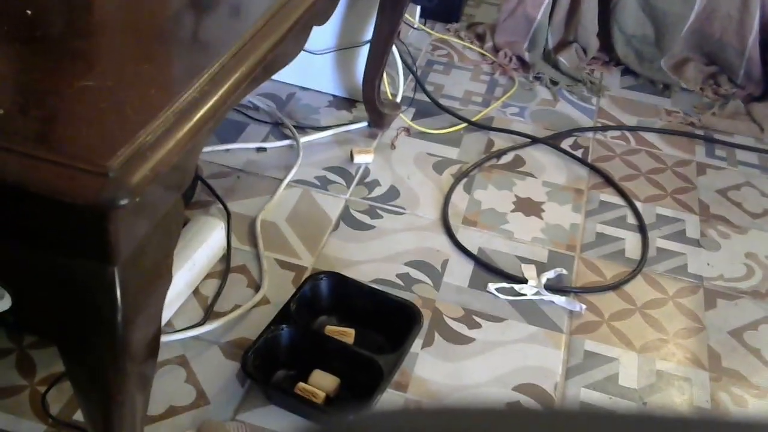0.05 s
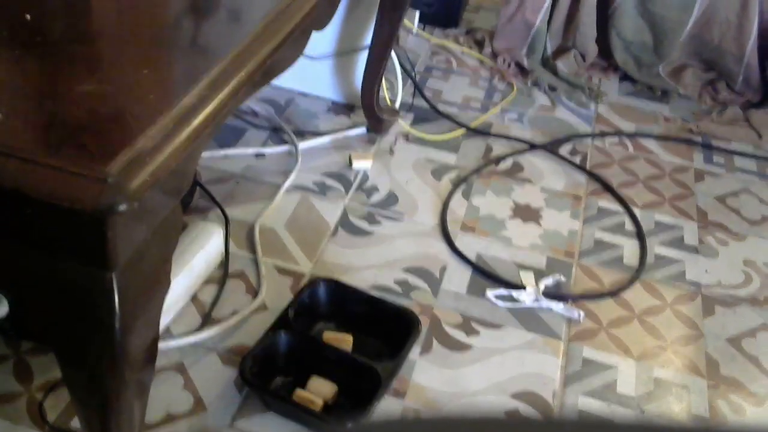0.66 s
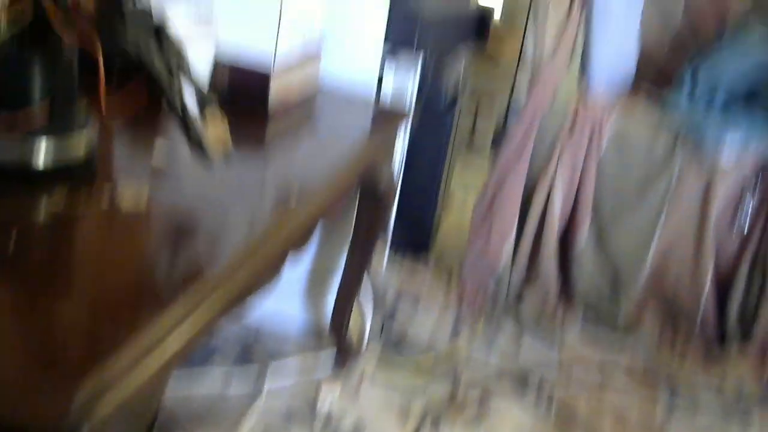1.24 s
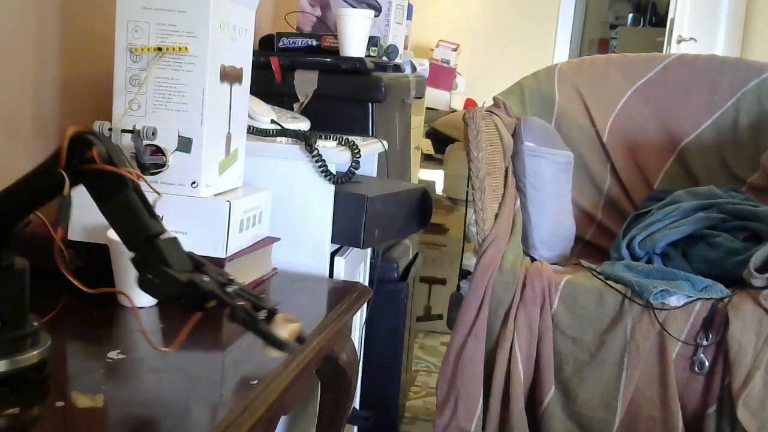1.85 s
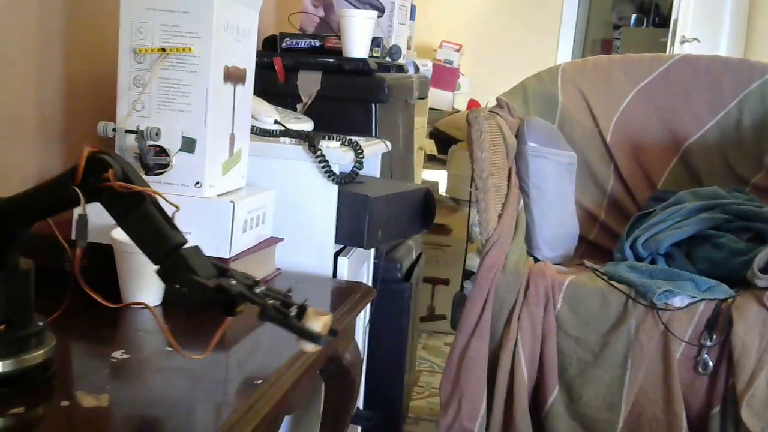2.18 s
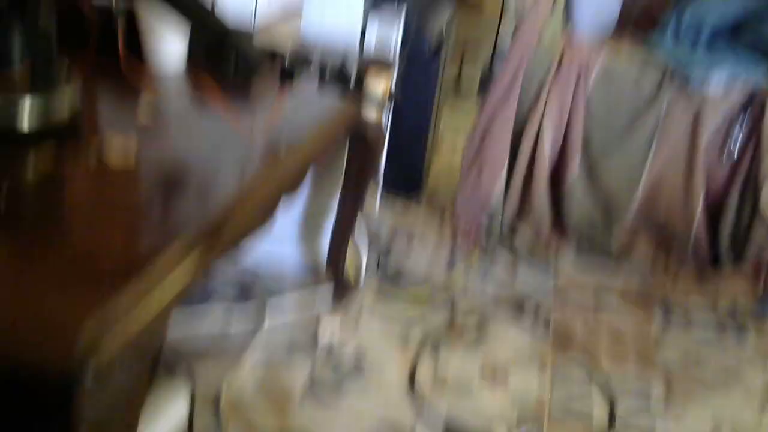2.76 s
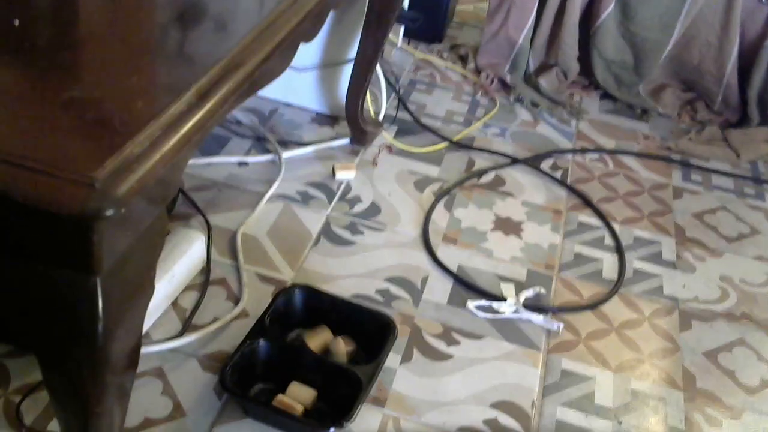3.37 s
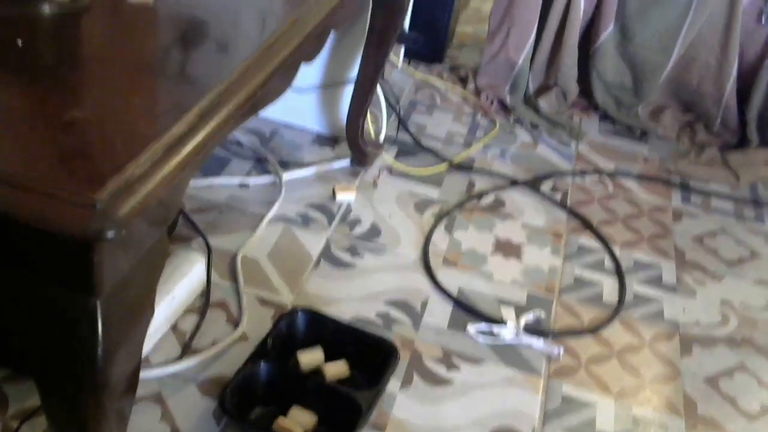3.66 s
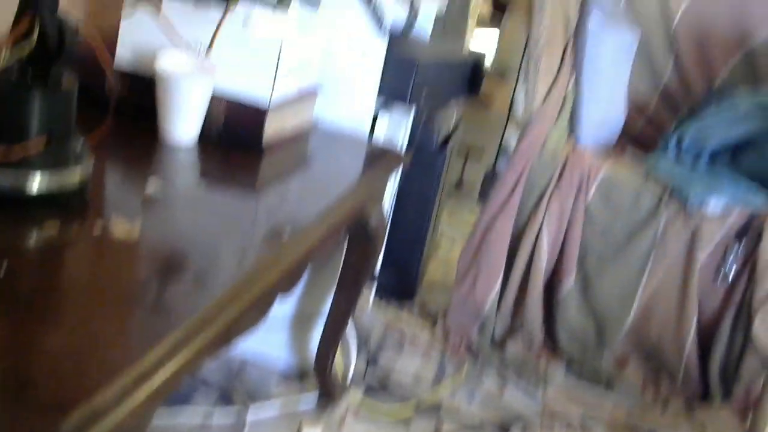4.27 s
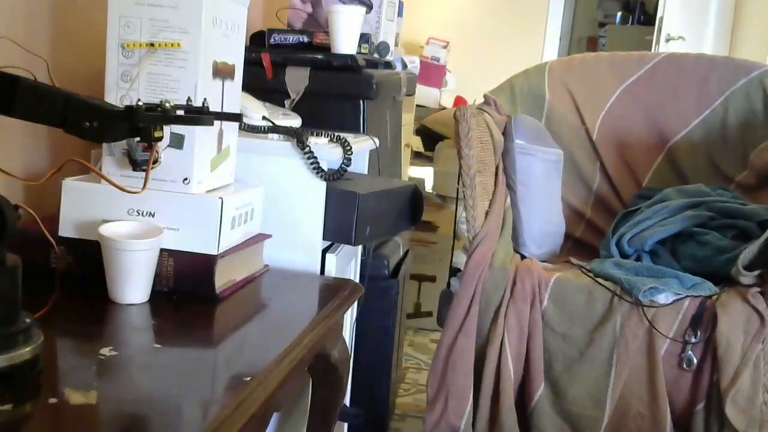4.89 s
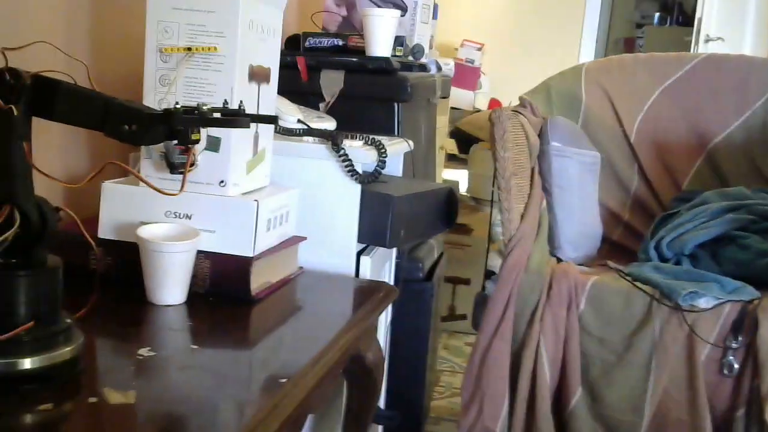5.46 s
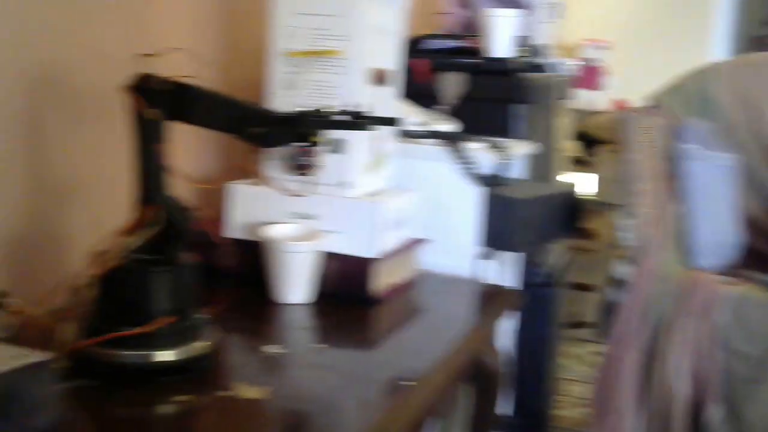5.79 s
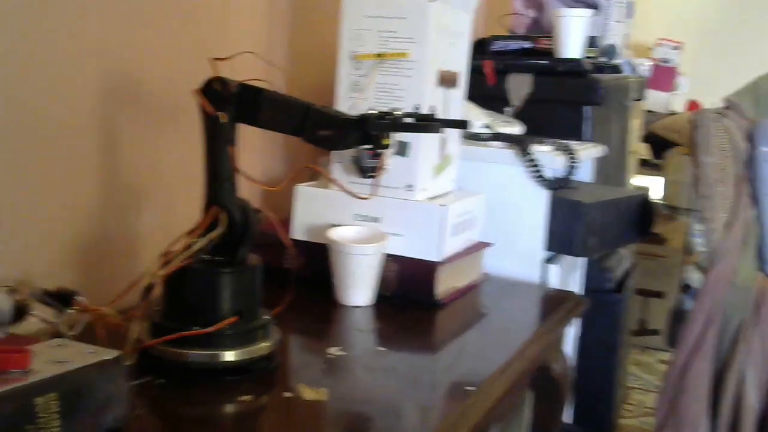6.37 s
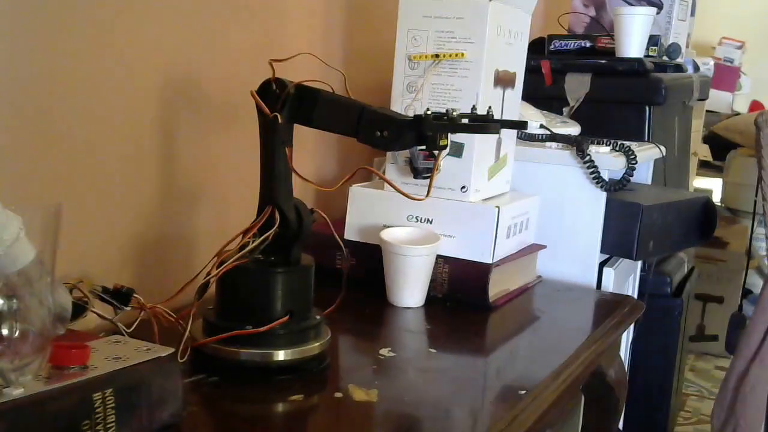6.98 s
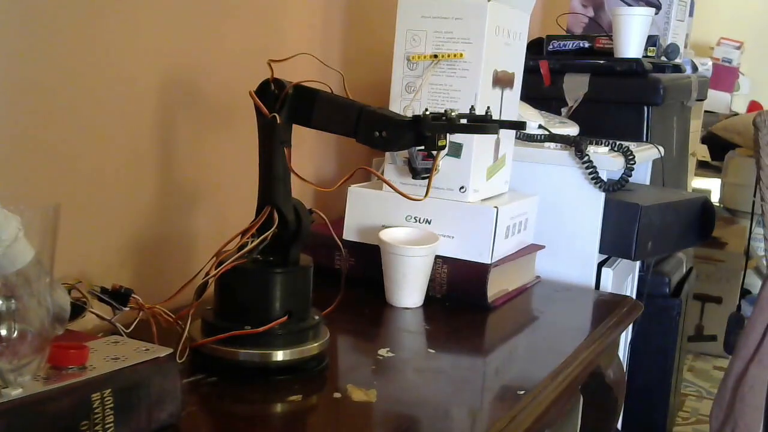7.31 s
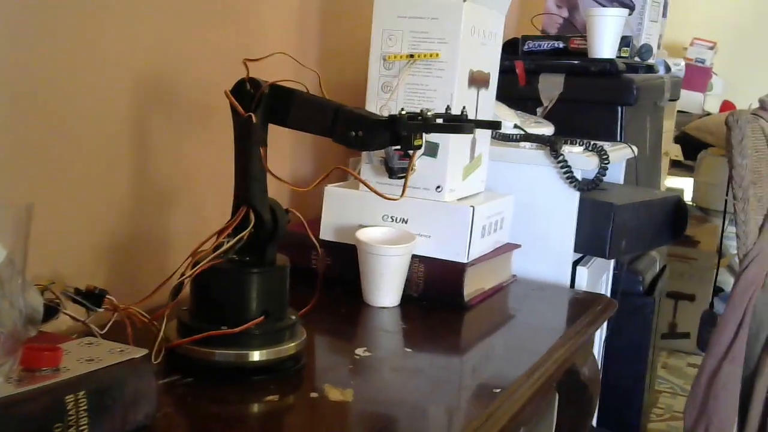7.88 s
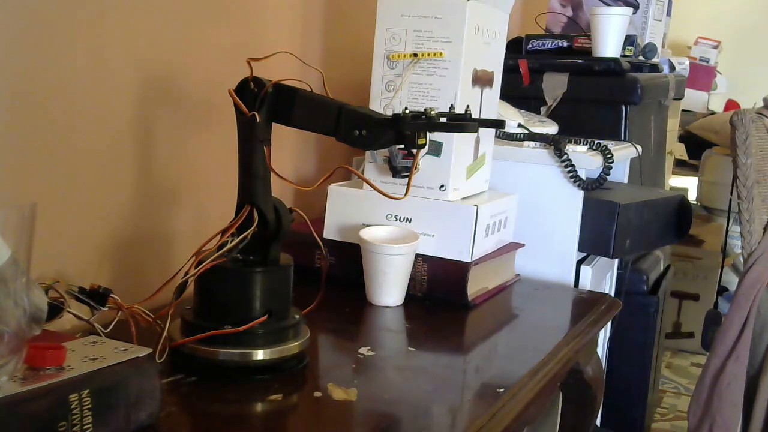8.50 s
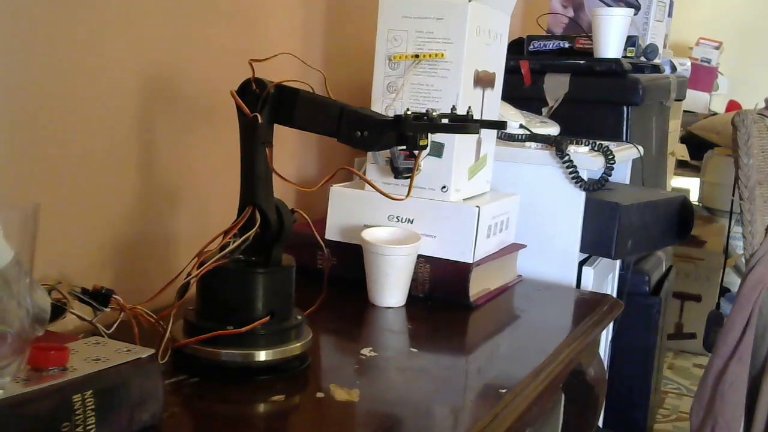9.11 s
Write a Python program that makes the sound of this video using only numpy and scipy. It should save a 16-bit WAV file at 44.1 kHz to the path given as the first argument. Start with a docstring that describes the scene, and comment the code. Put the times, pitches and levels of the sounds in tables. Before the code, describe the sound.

A small robot arm's geared servos whirr close by, thin, high and slightly grinding, each burst rising and falling in pitch and loudness. A short burst opens, followed by smaller twitches and a faint rustle around 0.5 seconds. A longer whirr runs from about 1.1 to 2 seconds, with a light hollow click at 1.5. Brief bursts come at 2.5 and 2.8 seconds. The loudest, highest sweep lasts from 3.1 to 3.7 seconds. Over it, at about 3.2, a small block drops into a thin plastic tray with a sharp clatter, the loudest sound, then bounces and rolls to rest by 3.7. Weaker whirrs follow, ending with a soft click and short buzz at about 4.5 seconds. From there until about 9 seconds there is only the quiet hush of a small furnished room, with a faint hum and a few soft, dull handling bumps.

```python
"""Geared servos whirr close by as a hobby robot arm on a table moves in short bursts.
Their gear teeth tap and grind; each move speeds up, cruises and brakes, and pitch, loudness and
brightness follow its pace. The arm drops a small block into a thin plastic tray, which rings
as the block bounces and rolls to rest. A few light clicks and a soft rustle sound over the hush
of a small furnished room."""
import sys
import numpy as np
from scipy import signal
from scipy.fft import rfft, irfft, next_fast_len
from scipy.io import wavfile
from scipy.ndimage import map_coordinates

SR = 44100
rng = np.random.default_rng(int(sys.argv[2]) if len(sys.argv) > 2 else 0)


def store_wav(level_fs):
    """Save 16-bit WAV to argv[1]."""
    pcm = np.round(np.clip(np.atleast_2d(level_fs), -1, 1) * 32767)
    wavfile.write(sys.argv[1], SR, pcm.T.astype(np.int16))


N = 407925

# Tone colours of the gearbox, the arm's ringing, the motor's thin buzz and a high fizz.
# Each row: frequency in Hz, relative level in dB.
GEARBOX_COLOUR = [(3600, -35.5), (4100, -17), (4450, -4), (4950, 0), (5250, 1.5), (5550, 0.5), (6150, 1),
                  (6600, -9.5), (7400, -26.5)]
ARM_COLOUR = [(1400, -39), (2000, -19.5), (2450, -13.5), (2950, -8.5), (3300, -6.5), (3750, -3), (4300, -4),
              (5200, -23.5)]
MOTOR_COLOUR = [(5200, -25.5), (6200, -6), (6600, 2.5), (7350, 0.5), (7800, -3), (8150, -10.5),
                (8450, -11.5), (9000, -15.5), (9700, -20.5), (11000, -38.5)]
FIZZ_COLOUR = [(8000, -31), (10000, 5), (11200, -0.5), (12500, -13), (15500, -29)]

def servos():
    """Gear teeth tap the servo case and the arm; a second joint and sliding teeth add a grinding."""
    speed, grind, whirr_db, buzz_db, arm_db, fizz_db = arm_motion()
    # the controller keeps correcting the speed, the more so under load
    correction = grind * (.06 * wobble(55) + .02 * wobble(170))
    tooth_count = np.cumsum(speed * (1 + correction)) / SR
    taps = gear_teeth(tooth_count, jitter_s=7e-6, scatter_db=2)
    second_count = np.cumsum(speed * .62 * (1 + .06 * wobble(45))) / SR
    second_joint = gear_teeth(second_count, jitter_s=14e-6, scatter_db=4)
    sliding = unit(rng.standard_normal(N) * np.exp(-1.5 * (tooth_count % 1)))  # a scrape after each tap
    grinding = unit(sliding + .9 * second_joint)
    kicks = amp(.5 * wobble(70))  # the controller feeds the motor unevenly
    gear_shake, motor_shake = (
        swinging_echoes(kicks * (np.sqrt(1 - share) * taps + np.sqrt(share) * grinding))
        for share in (grind, np.sqrt(grind)))  # the motor gets more of the grinding
    load_db = 1.2  # the changing load makes whirr and buzz swell unevenly
    whirr = amp(whirr_db + load_db * wobble(45)) * coloured(gear_shake, GEARBOX_COLOUR)
    arm_ring = amp(arm_db) * coloured(gear_shake, ARM_COLOUR)
    buzz = amp(buzz_db + load_db * wobble(45)) * coloured(motor_shake, MOTOR_COLOUR)
    return whirr + arm_ring + buzz + amp(fizz_db) * noise(FIZZ_COLOUR)


# The arm's moves. Each row: start, speed-up time, cruise time and braking time in seconds, top speed
# in teeth per second, share of grinding from 0 to 1, then levels in dB of whirr, buzz, arm ring and fizz.
MOVES = [ (-0.025, 0.075, .027, 0.17, 1035, 0.16, -36, -38, -47, -60),
         (0.13, 0.051, 0.013, 0.051, 450, .45, -50.5, -50.5, -74, -80),
         (0.332, 0.029, 0.0098, 0.036, 360, 0.55, -62, -61, -66, -82),
         (0.386, .02, 0.0074, 0.093, 820, 0.32, -44, -44, -53.5, -63),
         (0.419, .06, 0.039, 0.23, 270, 0.56, -75, -59, -66, -94),
         (0.7, .15, 0.28, .1, 260, .5, -67.5, -63, -72.5, -75),
         (0.836, .055, .095, 0.078, 540, 0.41, -62, -46.5, -71.5, -72),
         (1.07, .14, 0.042, 0.11, 426, .5, -65, -51, -67.5, -66),
         (1.172, 0.056, .2, .2, 700, 0.59, -46.5, -47, -69.5, -67),
         (1.15, 0.39, .28, .26, 920, 0.56, -42.5, -44, -68, -62),
         (1.76, 0.11, .05, 0.19, 800, .52, -44, -40.5, -69, -69),
         (1.901, 0.068, 0.098, 0.13, 440, 0.45, -62, -48, -73, -91),
         (2.05, 0.099, 0.29, 0.084, 336, 0.52, -67, -64, -75.5, -94),
         (2.455, .068, 0.026, 0.1, 1250, 0.3, -37.5, -39, -44, -56),
         (2.795, 0.021, 0.016, 0.018, 315, 0.57, -67, -65, -73, -70),
         (2.828, .016, .03, .11, 640, .42, -53, -40, -52.5, -61),
         (2.83, .06, .045, .055, 510, .42, -47, -45, -52.5, -60.5),
         (3.11, .1, .21, .4, 1520, .35, -33, -34, -38, -54.5),
         (3.64, 0.084, 0.041, 0.079, 525, 0.56, -44, -45, -56, -79),
         (3.808, 0.061, 0.025, .07, 530, .55, -51.5, -47.5, -66.5, -86.5),
         (3.9, 0.052, .02, .6, 260, 0.52, -70, -69, -73, -99.5),
         (4.28, 0.051, 0.063, 0.061, 270, 0.37, -73.5, -69.5, -74.5, -102),
         (4.51, 0.021, .02, .04, 260, .5, -65, -63, -73, -98),
         (4.54, 0.041, .028, .09, 470, .18, -48, -50, -64, -80), ]
# In the widest swing the speed wavers under load. Each row: time in seconds, speed in teeth per second.
WIDE_SWING = [(3.2, 1250), (3.25, 1330), (3.27, 1420), (3.31, 1345), (3.335, 1410), (3.39, 1340),
              (3.41, 1375), (3.43, 1260), (3.455, 1240), (3.48, 1130), (3.51, 1110), (3.53, 1010),
              (3.555, 985), (3.58, 860)]

def arm_motion():
    """Speed, grinding share and four levels follow the pace; where moves overlap, the strongest leads."""
    t = np.arange(0, N, 64) / SR
    start, rise, hold, fall, top_speed, top_grind, *top_levels = np.transpose(MOVES)[:, :, None]
    pace = swell(t, start, rise, hold, fall)
    crawl_speed, crawl_grind = 200.9, .52  # a barely turning servo
    speeds = crawl_speed + (top_speed - crawl_speed) * pace
    grinds = np.clip(crawl_grind + (top_grind - crawl_grind) * pace, 0, 1)
    grind = grinds[speeds.argmax(axis=0), np.arange(len(t))]
    swing = np.interp(t, *np.transpose(WIDE_SWING), left=0, right=0)
    speed = np.where(swing > 0, swing, speeds.max(axis=0))
    # after each move a faint tail of whirr and buzz dies away quickly
    since_stop = np.maximum(t - (start + rise + hold + fall), 0)
    tail_db = np.where(t > start + rise, -30.5 - 89.5 * since_stop, -np.inf)
    pace_db = 20 * np.log10(pace + 1e-6)
    powers = 1.7, 1.3, 2.6, 2.9  # how steeply whirr, buzz, arm ring and fizz grow with the pace
    levels = [np.max(db + np.maximum(power * pace_db, tail_db), axis=0)
              for db, power in zip(top_levels, powers)]
    return [np.interp(np.arange(N) / SR, t, curve) for curve in (speed, grind, *levels)]


def gear_teeth(count, jitter_s, scatter_db):
    """One sharp tap each time the tooth count passes a whole number, a little off in time and size."""
    at = np.interp(np.arange(1, int(count[-1])), count, np.arange(N))
    chance = rng.standard_normal((len(at), 2))
    size = np.sqrt(np.gradient(at)) * amp(scatter_db * chance[:, 0])
    at = at + jitter_s * SR * chance[:, 1]
    index = at.astype(int)[:, None] + np.arange(-7, 9)  # spread out, so a tap can land between samples
    offset = index - at[:, None]
    taps = size[:, None] * np.sinc(offset) * np.cos(np.pi * offset / 16) ** 2
    return unit(np.bincount(np.clip(index, 0, N - 1).ravel(), taps.ravel(), N))


# The whirr bounces off the table top and the arm. Each row: delay in seconds, gain (minus flips the wave).
ARM_ECHOES = [(.0011, .35), (.0023, -.35), (.0041, .35)]

def swinging_echoes(x):
    """Echo paths change as the arm swings, so each overtone fades in and out."""
    n = np.arange(N)
    echoes = sum(gain * np.interp(n - np.round((delay + 7e-5 * wobble(22)) * SR), n, x)
                 for delay, gain in ARM_ECHOES)
    return unit(x + echoes)


# The block hits the tray. Each row: start in seconds, level in dB, relative thump and crack levels in dB.
BOUNCES = [(3.1705, -13.5, -43.5, 1), (3.1766, -7.5, -51, 4.5), (3.1785, -10, -26, 0),
           (3.2132, -12, -36, -7.5), (3.216, -10.5, -10, -15), (3.2221, -15.5, -4.5, -12),
           (3.239, -16, -15, -10), (3.257, -17.5, -19, -12), (3.352, -22.5, -15, -5),
           (3.377, -25, -22, -6.5), (3.483, -27.5, -30, -11), (3.551, -25.5, -16, -7),
           (3.627, -37.5, -34, -7.5)]
# Ringing notes of the tray's walls and floor.
# Each row: pitch in Hz, relative level in dB, fade time in seconds before any extra damping.
WALL_NOTES = [(785, -8.5, .07), (1032, -5.5, 0.065), (950, -1.5, 0.07), (1237, 0.5, 0.14),
              (1263.7, 6, 0.086), (1347, 6, 0.068), (1634, -6.5, 0.044), (2024, 0, 0.08), (2003, 1.5, 0.14),
              (2061, -5, .05), (2485, -10, 0.048), (2860, -11.5, 0.0601), (2590, -1, 0.18),
              (3556, -0.5, 0.044), (4320, -7.5, 0.037)]
FLOOR_NOTES = [(120, -18.5, 0.19), (187, -11, .12), (232, -4, 0.18), (312, 0, .09), (397, 4, .11),
               (457, -0.5, 0.09), (580, -1, .1)]
# Tone colours of a hit's clatter and sharp crack. Each row: frequency in Hz, relative level in dB.
CLATTER_COLOUR = [(410, -53), (700, -24), (805, -18.5), (957, 0), (1130, -11), (1310, -8), (1610, -17.5),
                  (2010, -4), (2180, -8), (4310, -8.5), (5000, -24), (6500, -48), (11000, -120)]
CRACK_COLOUR = [(3000, -25), (5000, -10.5), (6300, 3), (7300, -13), (9000, -27), (15500, -36)]

def bounces():
    """Each blow cracks, rings the tray's walls and thumps its floor."""
    out = np.zeros(N)
    for start, db, thump_db, crack_db in BOUNCES:
        walls = .5 * ring(WALL_NOTES, damping=1.93, attack_s=.00023, scatter_db=1)
        clatter = .5 * burst(CLATTER_COLOUR, fade_s=.083)
        thump = amp(thump_db - 3.5) * ring(FLOOR_NOTES, damping=1, attack_s=.0018, scatter_db=2)
        crack = amp(crack_db) * burst(CRACK_COLOUR, fade_s=.02)
        add(out, start, amp(db) * (walls + clatter + thump + crack))
    return out


# Tone colours of the rolling block's rattle and the low drone of the tray's walls.
# Each row: frequency in Hz, relative level in dB.
RATTLE_COLOUR = [(750, -18.5), (1000, -6), (1300, 1.5), (1650, -8.5), (2050, -4), (2800, -10.5),
                 (4000, -17), (6000, -26.5)]
DRONE_COLOUR = [(300, -18.5), (420, -10.5), (530, -1.5), (620, -7), (800, -20.5)]

def rolling():
    """The block tumbles on, rattling and drumming the tray floor, softer and lower as it slows."""
    t = np.arange(N) / SR
    pace = swell(t, start=3.195, rise=.02, hold=0, fall=.52)
    hits = np.transpose(BOUNCES)[0]
    since_hit = np.abs(t - hits[np.searchsorted(hits, t) - 1])
    flare = amp(7 * np.exp(-since_hit / .027))  # the rattle flares up after each bounce
    contacts = crackle(per_second=900)
    wall_ring = ring(WALL_NOTES[:7], damping=4.8, attack_s=.0003, scatter_db=1)
    walls = signal.fftconvolve(contacts, wall_ring)[:N]
    walls = coloured(walls, [(700, -20), (950, -5), (1250, -2), (1500, -2.5), (2200, -13.5)])
    walls = unit(walls * amp(2.54 * wobble(35)))
    brightness = 1.2 * pace ** .22
    rattle = (.87 * walls + brightness * coloured(contacts, RATTLE_COLOUR)) / np.hypot(.7, brightness)
    drum_hz = (180 + 75 * pace) * (1 + .17 * wobble(140))
    drum = unit(sine(drum_hz) * (1 + .9 * wobble(110)))
    return (amp(-34) * pace ** 1.5 * flare * rattle
            + amp(-44) * pace ** .93 * drum
            + amp(-39.5) * pace ** 3.4 * noise(DRONE_COLOUR))


# Hollow clicks and small plastic ticks. Each row: start in seconds, relative level in dB.
CLICKS = [(1.503, -22.5), (4.51, -29.5)]
TICKS = [(0.7692, -36), (0.779, -46), (4.274, -58.5), (4.329, -54.5)]
# A click's ringing notes. Each row: pitch in Hz, relative level in dB, fade time in seconds.
CLICK_NOTES = [(1803, 10.5, 0.026), (1910, 1, 0.016), (1003, -4.5, 0.033), (765, -13.5, 0.054),
               (326, -18, 0.074), (146, -23.5, 0.041)]
# A tick's tone colour. Each row: frequency in Hz, relative level in dB.
TICK_COLOUR = [(710, -31), (1200, -17), (2220, -12), (3060, 3.5), (4340, -2), (5060, 2.5), (6540, -10),
               (7710, -9.5), (14000, -52)]

def clicks():
    """Hollow clicks with one strong ring, and dry plastic ticks."""
    out = np.zeros(N)
    puff_colour = [(80, -6), (900, 0), (2500, -5), (5000, -12), (6500, -30)]
    for start, db in CLICKS:
        add(out, start, amp(db - 3.5) * ring(CLICK_NOTES, damping=1, attack_s=.002, scatter_db=1))
        add(out, start, amp(db - 14) * burst(puff_colour, fade_s=.07))
    for start, db in TICKS:
        add(out, start, amp(db + 5) * burst(TICK_COLOUR, fade_s=.019))
    return out


# Short rubs. Each row: start in seconds, level in dB.
RUBS = [(0.5, -57.5), (0.54, -54.5), (0.582, -54.5), (0.622, -66), (0.652, -65.5)]
# Dull rumbles of handling. Each row: start in seconds, hold time in seconds, level in dB.
RUMBLES = [(0.385, 0.18, -60), (1.42, .1, -66.5), (2.82, .02, -68)]
# Their tone colours. Each row: frequency in Hz, relative level in dB.
RUB_COLOUR = [(1200, -13), (1800, -8), (2400, -4), (3200, -0.5), (3900, -8.5), (5000, -20)]
RUMBLE_COLOUR = [(40, -28), (90, -15), (150, 1), (200, 3), (260, -7.5), (400, -13)]

def rustle():
    """Something rubs in short crackling strokes; handling adds a dull rumble."""
    t = np.arange(N) / SR
    strokes = sum(amp(db) * swell(t, start, rise=.018, hold=.0074, fall=.036) for start, db in RUBS)
    rumble = sum(amp(db) * swell(t, start, rise=.03, hold=hold, fall=.36) for start, hold, db in RUMBLES)
    crackles = coloured(crackle(per_second=1100), RUB_COLOUR)
    grip = amp(3.5 * wobble(60))
    return strokes * grip * crackles + rumble * noise(RUMBLE_COLOUR)


def idling():
    """The motors hold their position with a faint fluttering buzz, heard between moves."""
    return amp(-87.5 + 2.5 * wobble(14)) * noise(MOTOR_COLOUR)


# Dull handling bumps. Each row: start in seconds, peak level in dB.
BUMPS = [(0.05, -50.5), (1.093, -54), (1.225, -48.5), (1.616, -52.5), (4.197, -52.5), (4.512, -52),
         (4.636, -49.5), (5.707, -50.5), (5.759, -51.5), (6.019, -54), (6.362, -53), (8.456, -52),
         (8.509, -52.5)]
# Faint appliance tones. Each row: pitch in Hz, relative level in dB.
APPLIANCE_TONES = [(150.7, -81), (323.0, -76), (419.9, -78.5), (592.2, -77.5), (2245, -85.5)]
# Tone colours of the room's hush and of its low hum and bumps.
# Each row: frequency in Hz, relative level in dB.
HUSH_COLOUR = [(15, -83.5), (25, -45.5), (140, -9.5), (178, -10.5), (267, -3.5), (389, -6), (421, -4),
               (582, -5.5), (666, -9.5), (722, -10.5), (2300, -17.5), (3260, -26.5), (7300, -29),
               (10100, -51.5), (15500, -52)]
LOW_COLOUR = [(120, -26.5), (220, -5), (290, -1.5), (380, -11), (560, -13), (800, -35)]

def hush():
    """Steady room noise with faint appliance tones, an uneven low hum and dull handling bumps."""
    bumps = np.zeros(N)
    for start, db in BUMPS:
        add(bumps, start, amp(db) * burst(LOW_COLOUR, fade_s=.13))
    tones = sum(amp(db - 1.5) * unit(sine(hz + 5 * wobble(25))) for hz, db in APPLIANCE_TONES)
    air = amp(-64.84) * noise(HUSH_COLOUR)
    hum = amp(-76.5 + 4.8 * wobble(37)) * noise(LOW_COLOUR)
    return air + hum + tones + bumps


# How long the room rings. Each row: frequency in Hz, seconds to fade by 60 dB.
ROOM_FADES = [(200, .3), (2000, 0.24), (7000, 0.062), (14000, .1)]

def room_echo(x):
    """The room adds a short tail, each frequency dying at its own speed."""
    hz, t, spectrum = signal.stft(rng.standard_normal(SR // 2), SR, nperseg=256)
    fade = amp(-60 * t / along(ROOM_FADES, hz)[:, None])
    tail = signal.istft(spectrum * fade, SR, nperseg=256)[1]
    return signal.fftconvolve(np.pad(x, (150, 0)), tail / np.linalg.norm(tail))[:N]


def amp(db):
    """Turn decibels into a gain."""
    return 10 ** (np.asarray(db) / 20)


def unit(x):
    """Scale to an average (rms) level of 1."""
    return x / np.sqrt(np.mean(x ** 2) + 1e-20)


def along(points, hz):
    """Read between (Hz, value) points, spacing octaves evenly."""
    freqs, values = np.transpose(points)
    return np.interp(np.log(hz + 1), np.log(freqs + 1), values)


def swell(t, start, rise, hold, fall):
    """Pace of a motion from 0 to 1: it creeps, speeds up, holds, then brakes evenly."""
    up = np.sin(np.pi / 2 * np.clip((t - start) / rise, 0, 1))
    down = np.clip(1 - (t - start - rise - hold) / fall, 0, 1)
    return up ** 1.35 * down


def wobble(per_second):
    """A smooth curve through this many random values a second."""
    coarse = np.arange(0, N + 32, 32)
    values = rng.standard_normal(int(N * per_second / SR) + 4)
    return np.interp(np.arange(N), coarse, map_coordinates(values, [coarse * per_second / SR]))


def sine(hz):
    """A pure tone that follows a changing pitch."""
    return np.sin(2 * np.pi * np.cumsum(hz) / SR)


def crackle(per_second):
    """Tiny taps at random times and strengths."""
    return (rng.random(N) < per_second / SR) * rng.standard_normal(N)


def coloured(x, colour):
    """Give x a tone colour that falls steeply beyond its ends; the result has level 1."""
    size = 2 * next_fast_len(len(x) // 2 + 4096)
    hz = np.fft.rfftfreq(size, 1 / SR)
    closed = [(colour[0][0] / 2, -100), *colour, (colour[-1][0] * 2, -100)]
    cepstrum = irfft(np.log(amp(along(closed, hz))), size)
    cepstrum[1:size // 2] *= 2  # folded so the filter rings only after a tap, never before
    cepstrum[size // 2 + 1:] = 0
    return unit(irfft(rfft(x, size) * np.exp(rfft(cepstrum)), size)[:len(x)])


def noise(colour):
    """Steady coloured noise at level 1."""
    return coloured(rng.standard_normal(N), colour)


def burst(colour, fade_s):
    """A puff of coloured noise with peak 1, dying by 60 dB in fade_s."""
    t = np.arange(SR // 2) / SR
    x = coloured(rng.standard_normal(len(t)) * amp(-60 * t / fade_s), colour)
    return x / np.abs(x).max()


def ring(notes, damping, attack_s, scatter_db):
    """A struck object's notes ring and fade, at new strengths on each hit; peak 1."""
    t = np.arange(SR // 2) / SR
    x = np.zeros(len(t))
    for hz, db, fade_s in notes:
        loudness = amp(db + scatter_db * rng.normal() - 60 * t * damping / fade_s)
        x += loudness * np.sin(2 * np.pi * (hz * t + rng.random()))
    x *= 1 - np.exp(-t / attack_s)
    return x / np.abs(x).max()


def add(track, start, x):
    """Mix x into the track at start seconds."""
    part = track[round(start * SR):][:len(x)]
    part += x[:len(part)]


def scene():
    """The arm is near; the tray lies farther off on the floor, and its sounds carry no deep bass."""
    arm = servos() + idling() + rustle()
    bass_cut = signal.butter(3, 120, "high", fs=SR, output="sos")
    tray = signal.sosfilt(bass_cut, bounces() + rolling())
    return (arm + clicks() + tray + room_echo(amp(-12) * arm + amp(-9.5) * tray) + hush())[None]


def record(dry):
    """The microphone rounds off the sharpest peaks and keeps nothing above its highest frequency."""
    ceiling, top_hz = .8, 15750
    rounded = dry / (1 + np.abs(dry / ceiling) ** 4) ** (1 / 4)
    size = next_fast_len(N + SR // 2)
    passed = np.fft.rfftfreq(size, 1 / SR) < top_hz
    return irfft(rfft(rounded, size) * passed, size)[:, :N]


dry = scene()
out = record(dry)
store_wav(out)
```